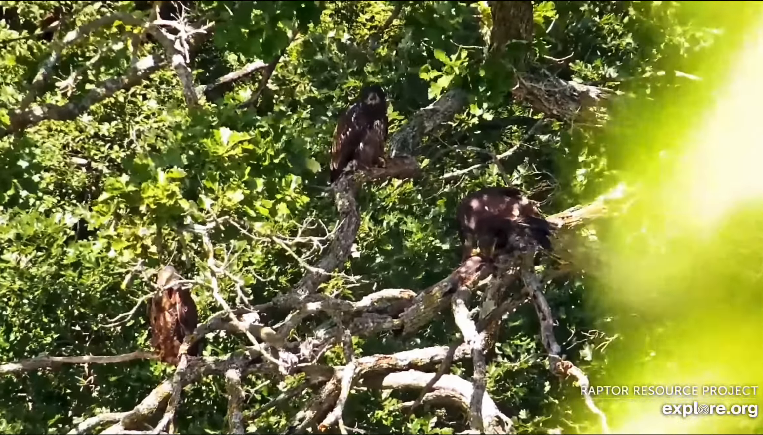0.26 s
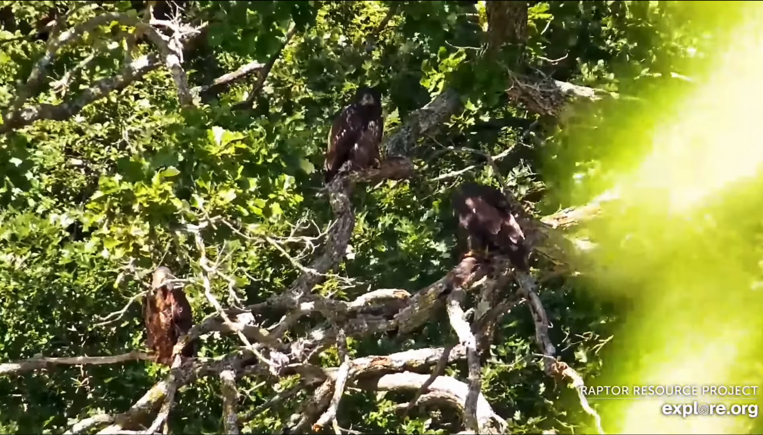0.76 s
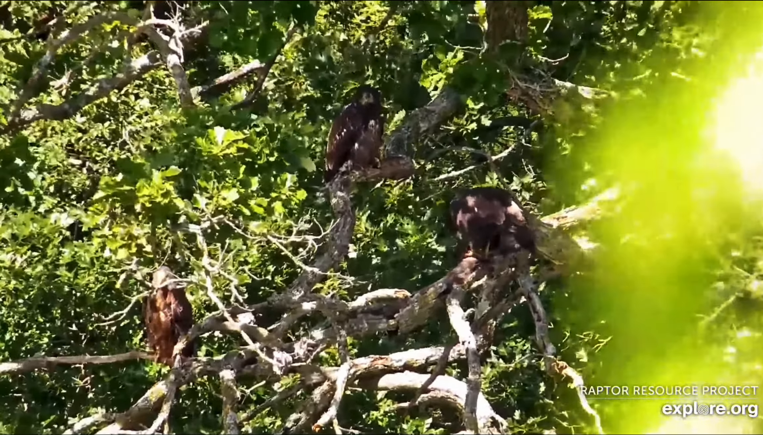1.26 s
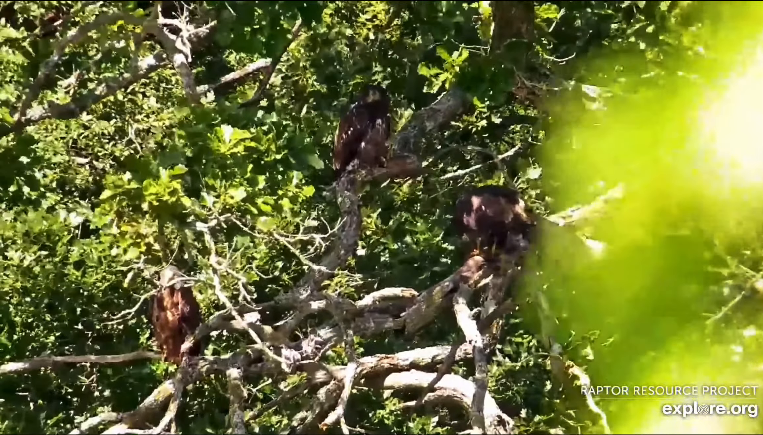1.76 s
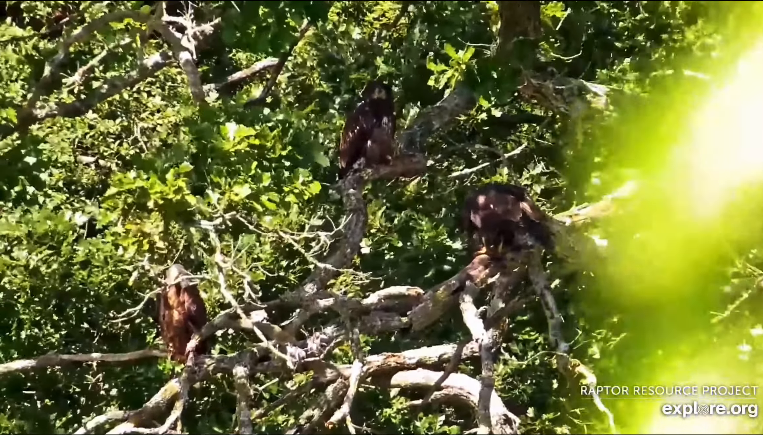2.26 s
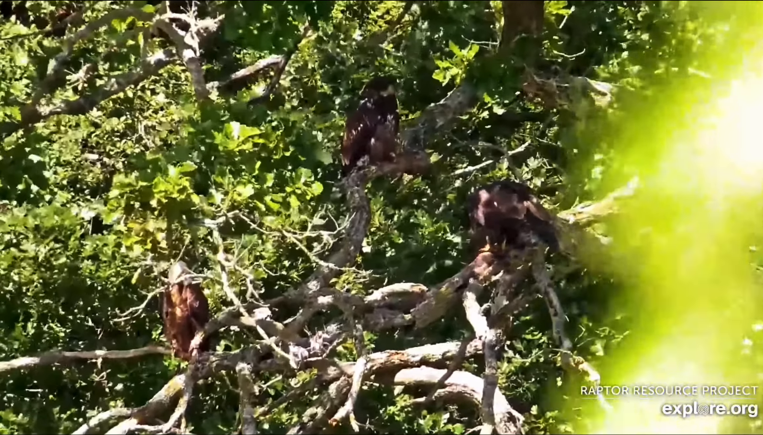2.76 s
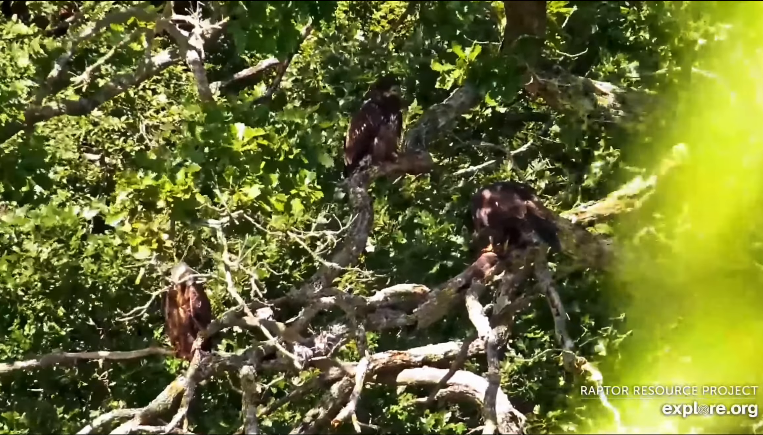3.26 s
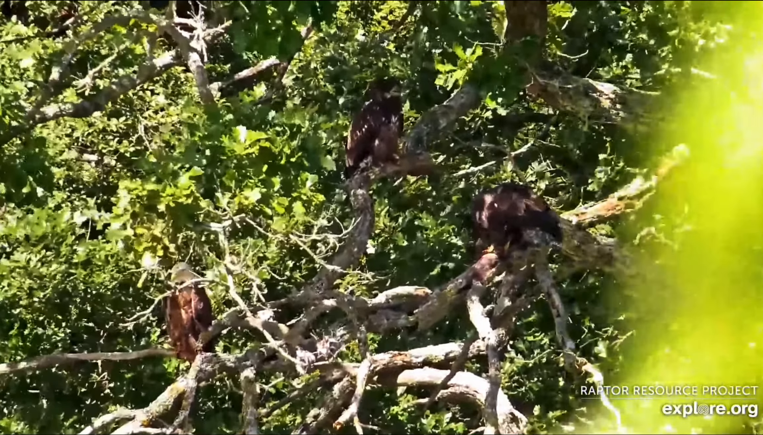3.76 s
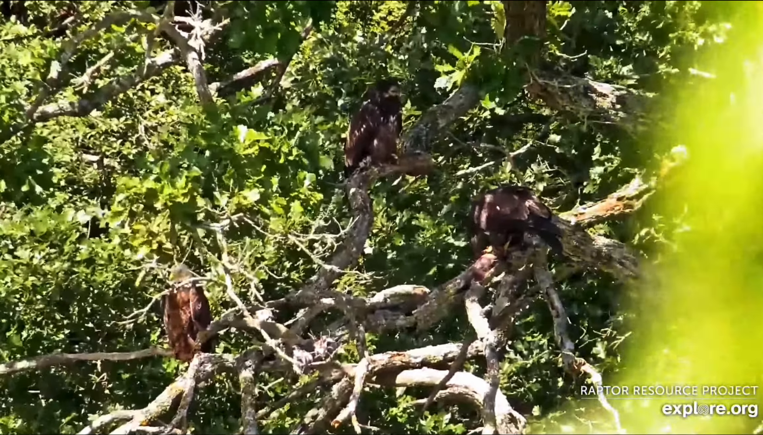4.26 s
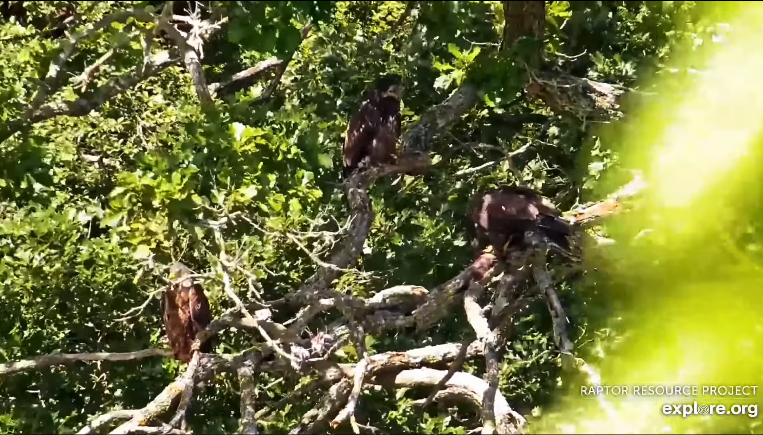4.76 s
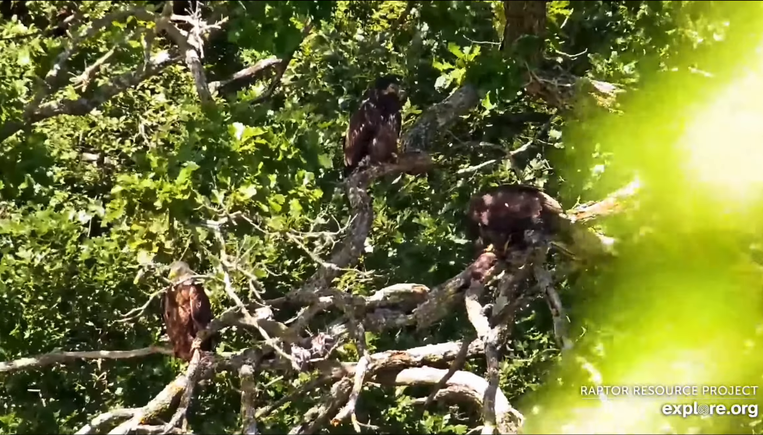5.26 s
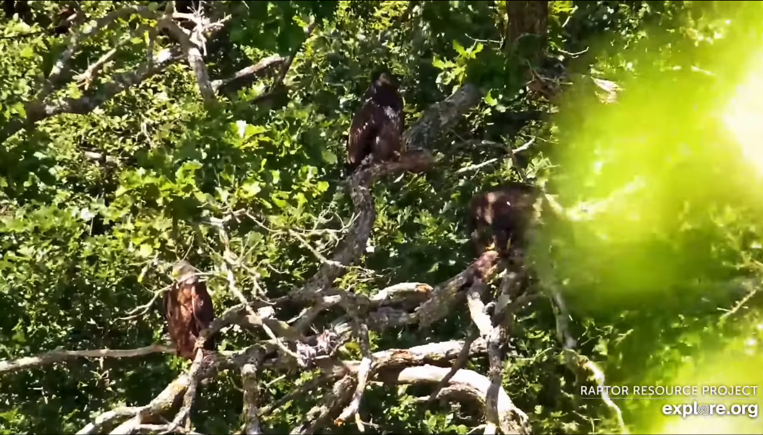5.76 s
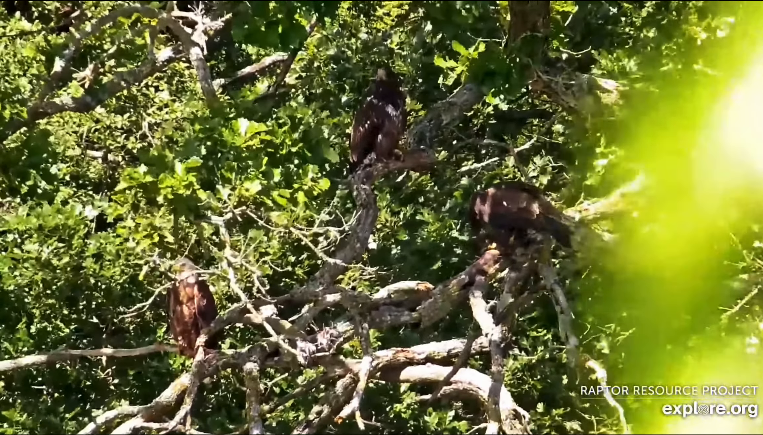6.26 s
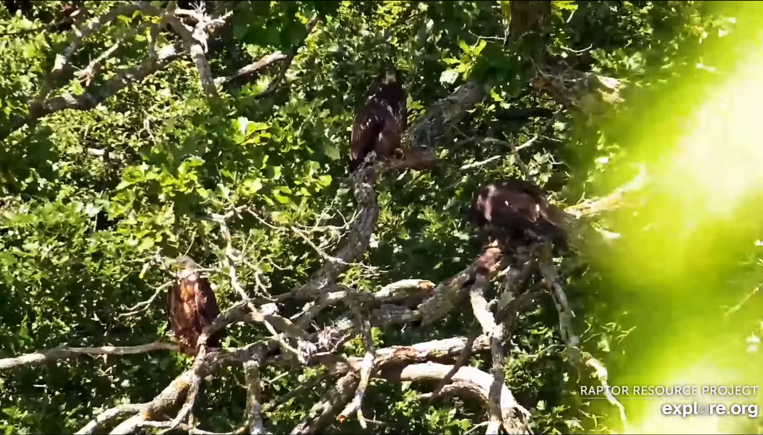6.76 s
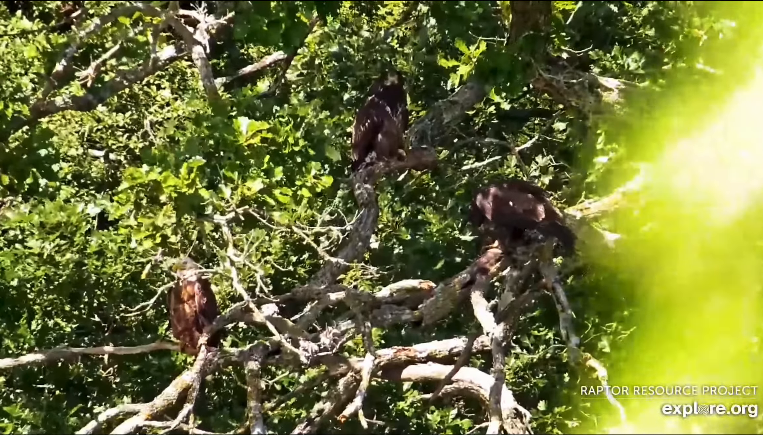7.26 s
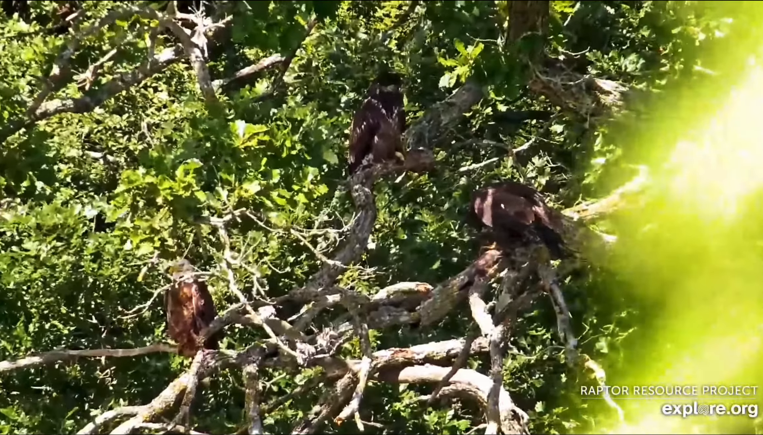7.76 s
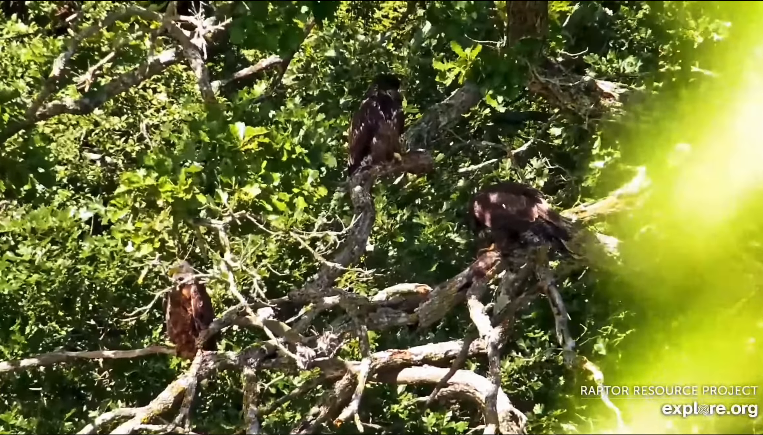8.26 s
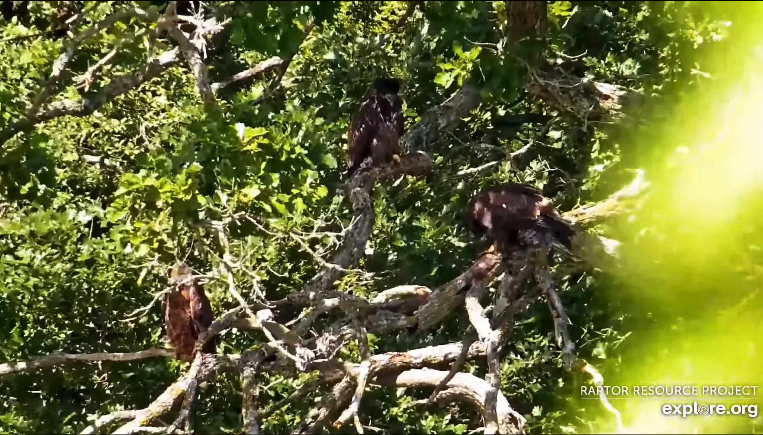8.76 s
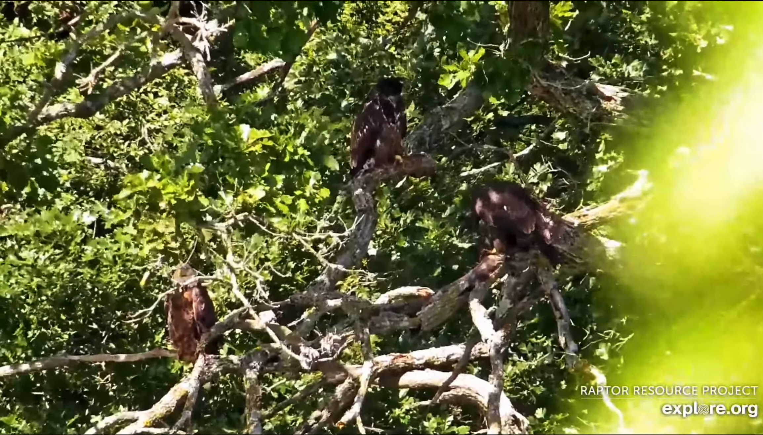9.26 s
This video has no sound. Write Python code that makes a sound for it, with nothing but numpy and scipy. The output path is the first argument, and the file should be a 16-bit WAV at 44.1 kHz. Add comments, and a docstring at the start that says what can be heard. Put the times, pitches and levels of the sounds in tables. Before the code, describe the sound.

Outdoors in woodland, a close songbird opens with a quick flurry while far hoarse caws, two young eagle squeals and soft low wind gusts overlap. A small distant bird seesaws up and down, smeared by echoes. After faint twitter, four more squeals climb, crack and tumble. A quieter gap leads to a longer, louder songbird flurry. A fixed outdoor microphone adds constant low hum and a thin buzzing whine.

```python
"""First come a near songbird's opening flurry, far hoarse caws, two squeals of young eagles and gusts of rumble.
A seesaw song and its blurred echoes follow, with level tails of the second squeal, then faint far twitter.
The eagles squeal again, climbing, breaking, tumbling; a longer flurry of the near songbird ends the scene.
Voices are wavering sines with a weak octave; the trees are sparse echoes; air and blurred song are noise;
gear hums and whines throughout over a steady hush: low tones and a chirp on every mains half wave."""
import sys
import numpy as np
from scipy import signal
from scipy.fft import rfft, irfft
from scipy.io import wavfile
from scipy.ndimage import uniform_filter1d

SR = 44100
rng = np.random.default_rng(int(sys.argv[2]) if len(sys.argv) > 2 else 0)


def transcribe(u):
    """Save the signal u as a 16-bit wav file named by the first command-line argument.

    u: samples, shape (n,) or (channels, n), limited to [-1, 1]; the rate is SR.
    q: integer samples, one column per channel.
    """
    v = np.clip(np.atleast_2d(u).T, -1, 1)
    q = np.round(v * 32767).astype(np.int16)
    wavfile.write(sys.argv[1], SR, q)


N = 419391
T = np.arange(N) / SR   # time [s]

# swells of blurred high song: first the seesaw song's echoes among the trees, later faint far twitter:
# (middle [s], half width [s], level [dB])
HIGH_SWELLS = [(1.25, 0.24, -64), (1.56, 0.11, -61.5), (2.2, 0.47, -70), (3.03, 0.12, -70),
               (4.72, .12, -69)]
# bouts of a far, lower song: (middle [s], half width [s], level [dB])
LOW_BOUTS = [(2.55, .15, -74), (3.12, .22, -73)]
HIGH_BED_DB, LOW_BED_DB = -75, -80   # between the swells and bouts


def from_db(db):
    """Decibels to gain."""
    return 10 ** (np.asarray(db) / 20)


def rms_one(x):
    """Scale to unit rms."""
    return x / np.sqrt(np.mean(x ** 2) + 1e-20)


def drift(rate, size=N):
    """Random wander joining `rate` new normal values a second by straight lines."""
    at = np.arange(size) / SR * rate
    points = int(at[-1]) + 2
    return np.interp(at, np.arange(points), rng.standard_normal(points))


def noise(colour):
    """Unit noise with the given spectrum."""
    hz, db = np.transpose(colour)
    bins = np.maximum(np.arange(N // 2 + 1) * SR / N, 1)
    gain = from_db(np.interp(np.log(bins), np.log(hz), db, left=-80))
    return rms_one(irfft(rfft(rng.standard_normal(N)) * gain, N))


def surges(bed_db, rows):
    """Gain of a bed with bell-shaped surges on top, added in power."""
    power = from_db(bed_db) ** 2
    for middle, width, db in rows:
        power = power + from_db(db) ** 2 * np.exp(-((T - middle) / width) ** 2)
    return np.sqrt(power)


def progress(length_s):
    """A ramp from 0 to 1 over one note."""
    return np.linspace(0, 1, max(int(length_s * SR), 16))


def glide(u, start, middle, end):
    """A pitch that bends smoothly through three values as u goes from 0 to 1."""
    return start * (1 - u) * (1 - 2 * u) + middle * 2 * u * (2 - 2 * u) + end * u * (2 * u - 1)


def swell(u, peak):
    """A rounded rise and fall with its top at u = peak."""
    return np.sin(np.interp(u, [0, np.clip(peak, .05, .95), 1], [0, np.pi / 2, np.pi])).clip(0)


def add(out, s, sound):
    """Mix a sound in at time s."""
    i = int(np.clip(s * SR, 0, N - 1))
    out[i:i + len(sound)] += sound[:N - i]


def syrinx(hz, jitter, flutter_db, overtone_db):
    """A nearly pure whistle of about unit rms, unsteady in pitch and strength, with a weak octave."""
    phase = 2 * np.pi * np.cumsum(hz * (1 + jitter * drift(501, size=len(hz)))) / SR
    strength = from_db(flutter_db * drift(130, size=len(hz)))
    return np.sqrt(2) * strength * (np.sin(phase) + from_db(overtone_db) * np.sin(2 * phase))


def whistle(hz, peak):
    """One songbird note along a pitch track; the high ones are rougher."""
    jitter = .016 if hz.mean() > 4500 else .006
    voice = syrinx(hz, jitter, flutter_db=2.5, overtone_db=-48)
    return swell(np.linspace(0, 1, len(hz)), peak) ** 0.67 * voice


def slur(length_s, pitches, peak):
    """A whistle that bends through three pitches."""
    return whistle(glide(progress(length_s), *pitches), peak)


def trill(length_s, per_s, top_hz, bottom_hz):
    """An uneven trill in which the pitch drops anew with every chip."""
    u = progress(length_s)
    chip = (u * length_s * per_s + .13 * drift(per_s, size=len(u))) % 1   # place within a chip, 0-1
    hz = top_hz + (bottom_hz - top_hz) * chip
    voice = syrinx(hz, jitter=.055, flutter_db=2.5, overtone_db=-36)
    return swell(u, 0.51) ** 0.44 * swell(chip, 0.51) * voice


def wood(x, wet_db, t60, build_s, edge_s, edge_db, dull_hz):
    """Branches send back many small, dull echoes; a cluster comes late from the edge of the wood."""
    t = T[:SR]
    echoes = rng.standard_normal(SR) * (rng.random(SR) < 1500 / SR)   # about 1500 a second
    decay = from_db(-60 * t / t60) * (1 - np.exp(-t / build_s))
    edge = from_db(edge_db) * np.exp(-((t - edge_s) / 0.0061) ** 2)
    echoes *= decay + edge
    tail = signal.fftconvolve(x, echoes / np.sqrt(np.sum(echoes ** 2)))[:N]
    dulling = signal.butter(2, dull_hz, fs=SR, output="sos")
    return from_db(wet_db) * signal.sosfilt(dulling, tail)


def hush():
    """Steady outdoor hush: noise with a fixed colour."""
    # (frequency [Hz], relative density [dB per Hz])
    hush_colour = [(40, -10), (130, 0), (200, -3.5), (300, -9.5), (420, -16), (750, -21.5), (1500, -19.5),
                   (2700, -18), (3400, -18.5), (5000, -20), (6400, -24.5), (10000, -26.5), (13800, -29),
                   (16000, -27.5)]
    level_db = -61.8
    return from_db(level_db) * noise(hush_colour)


def rumble(lumpy_db):
    """Low, lumpy air noise: a few gusts over a calm that slowly dies down."""
    # gusts of air: (middle [s], half width [s], level [dB])
    gusts = [(.55, .05, -51), (1.02, 0.28, -48.5), (1.39, 0.067, -45), (1.7, 0.46, -53), (4.1, 0.73, -58)]
    # (frequency [Hz], relative density [dB per Hz])
    rumble_colour = [(10, -24.5), (25, -10.5), (45, 1), (70, 0), (100, -4), (150, -11), (250, -25),
                     (500, -51)]
    calm_db, fall_db_per_s = -54, 0.49
    gain = surges(calm_db - fall_db_per_s * T, gusts)
    return gain * from_db(lumpy_db * drift(9)) * noise(rumble_colour)


def hum(level_db):
    """Steady low tones: a motor just under twice the mains rate beats with mains hum about twice a second."""
    # motor and mains tones: (frequency [Hz], rms level before level_db [dB])
    hum_tones = [(118.13, -53.5), (119.976, -59.5), (239.95, -71), (254.7, -78), (479.9, -86)]
    tones = np.zeros(N)
    for k, (hz, db) in enumerate(hum_tones):
        tones += (-1) ** k * from_db(db) * np.sin(2 * np.pi * hz * T)   # polarity alternates
    return np.sqrt(2) * from_db(level_db + 0.69 * drift(0.96)) * tones


def supply_whine(phase_jitter, flutter_db, stumble_share, stumble_jitter):
    """A switching supply chirps on each mains half wave; now and then it stumbles into a rasp."""
    # one chirp for each half wave: (start [mains cycles], length [mains cycles],
    # start pitch [Hz], middle pitch [Hz], end pitch [Hz])
    chirps = [(.368, .3328, 4369, 3794, 3670), (.8697, .3301, 4076, 4040, 4032)]
    # harmonics from the first up: level [dB]
    harmonics_db = [-60.5, -57, -61, -68]
    mains_hz = 59.988
    out, grid = np.zeros(N), progress(1)
    stumbling = uniform_filter1d(1.0 * (drift(330) > 1.25), size=20)
    for start, length, start_hz, middle_hz, end_hz in chirps:
        u = np.minimum((T * mains_hz - start) % 1 / length, 1)
        summed_pitch = np.cumsum(glide(grid, start_hz, middle_hz, end_hz)) / SR
        turns = np.interp(u, grid, summed_pitch) * length / mains_hz
        phase = 2 * np.pi * turns + phase_jitter * drift(160)
        rasp = stumble_jitter * stumbling * drift(1400)
        gate = np.clip(np.minimum(u, 1 - u) / .086, 0, 1)   # ramps at both ends, silent between chirps
        strength = gate * from_db(flutter_db * drift(400)) * (1 - stumble_share * stumbling)
        for k, db in enumerate(harmonics_db, 1):
            out += strength * from_db(db) * np.sin(k * phase + rasp)
    return np.sqrt(2) * out


def whine_side():
    """The top of a looser whine, to be laid over the two channels in opposite polarity."""
    loose_whine = supply_whine(phase_jitter=1.5, flutter_db=1.0, stumble_share=.3, stumble_jitter=1.5)
    top_only = signal.butter(16, 4900, "high", fs=SR, output="sos")
    return from_db(-16) * signal.sosfilt(top_only, loose_whine)


def blurred_song():
    """Swells of high song and a far, lower song, both blurred into flickering patches of noise."""
    # both colours: (frequency [Hz], relative density [dB per Hz])
    high_colour = [(3800, -18), (4600, -4), (5200, -5.5), (6200, -10.5), (7200, -0.5), (8500, -41)]
    low_colour = [(1900, -20), (2450, -1), (2700, 0.5), (3100, -11.5), (3600, -17.5)]
    high = surges(HIGH_BED_DB, HIGH_SWELLS) * from_db(2.5 * drift(24)) * noise(high_colour)
    low = surges(LOW_BED_DB, LOW_BOUTS) * from_db(2.5 * drift(24)) * noise(low_colour)
    return high + low


def stray_notes():
    """Single notes at random times that stand out of the blurred song, their strength following it."""
    per_s, length_s, level_db = 3, .05, -2   # for each layer; level relative to the layer's gain
    high_hz, low_hz = (5350, 5180, 5030), (2567, 2706, 2680)   # (start, middle, end), before detuning
    layers = ((high_hz, surges(HIGH_BED_DB, HIGH_SWELLS)), (low_hz, surges(LOW_BED_DB, LOW_BOUTS)))
    out = np.zeros(N)
    for pitches, gain in layers:
        for when, detune in rng.random((int(per_s * N / SR), 2)):
            note = slur(length_s, np.array(pitches) * (1 + .12 * (detune - .5)), peak=.5)
            add(out, when * N / SR, from_db(level_db) * gain[int(when * N)] * note)
    return out


def seesaw():
    """A small bird deep in the wood, heard mostly by its echoes: up, then down from higher still."""
    # the turn of each figure: (time [s], level before echoes [dB])
    turns = [(1.056, -65.5), (1.242, -59.5), (1.408, -57.5), (1.57, -58)]
    up_s, up_hz = .086, (4100, 4800, 5560)   # pitches (start, middle, end)
    down_s, down_hz = .042, (7250, 6470, 5880)
    out = np.zeros(N)
    for s, db in turns:
        add(out, s - up_s, from_db(db) * slur(up_s, up_hz, peak=0.59))
        add(out, s, from_db(db) * slur(down_s, down_hz, peak=0.61))
    return out + wood(out, wet_db=1.0, t60=0.38, build_s=0.0037, edge_s=0.097, edge_db=-17, dull_hz=8500)


def caws():
    """Hoarse arched calls of a far, crow-like bird: a low voice roughened by strong pitch jitter."""
    # about every 0.4 s: (time [s], level [dB])
    calls = [(.098, -60.5), (.482, -59.5), (0.889, -70), (1.317, -67.5)]
    length_s, pitches = .115, (1268, 1448, 1190)   # pitches (start, middle, end) [Hz]
    out = np.zeros(N)
    u = progress(length_s)
    for s, db in calls:
        voice = syrinx(glide(u, *pitches), jitter=0.045, flutter_db=2.2, overtone_db=-30)
        add(out, s, from_db(db) * swell(u, 0.33) ** 0.52 * voice)
    return out


def squeal_tails():
    """Level 3 kHz tails, echoes of the second squeal's opening: nearly pure tones on one pitch."""
    # (time [s], length [s], level [dB])
    tails = [(1.243, 0.21, -66), (1.701, .105, -57), (1.8, .12, -66.5)]
    pitch_hz = 3005
    out = np.zeros(N)
    for s, length, db in tails:
        u = progress(length)
        tone = syrinx(np.full(len(u), pitch_hz), jitter=0.0035, flutter_db=2.0, overtone_db=-46)
        add(out, s, from_db(db) * swell(u, .3) ** .55 * tone)
    return out


def held_notes(out):
    """Notes of the near singer that slide from an onset onto a held pitch."""
    # (time [s], length [s], onset pitch [Hz], held pitch [Hz], end pitch [Hz],
    # level [dB], place of the peak [0-1])
    notes = [ (.002, .071, 2800, 3350, 3275, -51.5, .6), (0.437, 0.043, 3430, 3510, 3300, -52, 0.6),
             (.498, 0.026, 3300, 3340, 3300, -43, 0.2), (7.877, .104, 4450, 3340, 3280, -40, 0.52),
             (8.162, .045, 3370, 3630, 3635, -48, 0.08), (8.197, 0.059, 3565, 3590, 3410, -40, 0.22),
             (8.349, 0.054, 3474, 3183, 3416, -44, .35), (8.772, 0.099, 3530, 3285, 3412, -38.5, 0.88)]
    settle_s = .016
    for s, length, onset_hz, held_hz, end_hz, db, peak in notes:
        u = progress(length)
        onset_slide = (onset_hz - held_hz) * np.exp(-u * length / settle_s)
        hz = held_hz + (end_hz - held_hz) * u + onset_slide
        add(out, s, from_db(db) * whistle(hz, peak))


def swoops(out):
    """Steep slurs down from the top of the near singer's voice."""
    # (time [s], level [dB])
    rows = [(.347, -44), (8.678, -43)]
    for s, db in rows:
        add(out, s, from_db(db) * slur(.102, (5256, 3520, 2827), peak=.62))


def chatter(out):
    """Low chatter of the near singer: a slur down, a trill and a fading slur lower still."""
    # (time [s], level of the trill [dB])
    rows = [(.046, -51.5), (8.4, -50)]
    slur_s, slur_hz, slur_db = .065, np.array((2524, 2220, 2120)), -3   # levels relative to the trill
    end_delay_s, end_ratio, end_db = .12, .84, -13.5   # end_ratio lowers the pitch of the last slur
    for s, db in rows:
        add(out, s, from_db(db + slur_db) * slur(slur_s, slur_hz, peak=0.15))
        chips = trill(.072, per_s=62, top_hz=2820, bottom_hz=2110)
        add(out, s + slur_s, from_db(db) * chips)
        last = slur(slur_s, end_ratio * slur_hz, peak=.3)
        add(out, s + end_delay_s, from_db(db + end_db) * last)


def mews_and_chips(out):
    """Mews that sag ever faster, and quick chips that slide fastest at first."""
    # both: (time [s], length [s], start pitch [Hz], end pitch [Hz], level [dB])
    mews = [(9.162, .15, 2724, 2375, -56), (9.419, 0.096, 2490, 1860, -55.5)]
    chips = [ (.063, .028, 5170, 4500, -59), (.285, .024, 5050, 4530, -61), (7.487, .02, 2750, 3250, -62),
             (7.505, 0.031, 3260, 2430, -57), (7.674, 0.021, 2510, 3710, -53.5),
             (7.862, 0.031, 4090, 4250, -49), (8.853, 0.02, 2260, 2100, -59),
             (9.007, .018, 3020, 1700, -58.5), (9.075, 0.038, 3130, 3480, -55.5),
             (9.101, .032, 2430, 2280, -58), (9.125, 0.0137, 3440, 2520, -54.5),
             (9.144, 0.012, 3400, 2710, -52), (9.382, 0.029, 4000, 2930, -53)]
    for rows, bend, peak in ((mews, .28, .38), (chips, .65, .6)):   # bend: share of the slide at half time
        for s, length, start_hz, end_hz, db in rows:
            middle_hz = start_hz + bend * (end_hz - start_hz)
            add(out, s, from_db(db) * slur(length, (start_hz, middle_hz, end_hz), peak))


def falling_trills(out):
    """Short trills of falling chips."""
    # (time [s], length [s], rate [chips per s], top pitch [Hz], bottom pitch [Hz], level [dB])
    rows = [ (7.7, 0.066, 140, 5970, 4450, -54.5), (8.249, 0.023, 116, 3230, 2220, -51),
            (9.386, 0.041, 117, 6240, 4300, -47)]
    for s, length, per_s, top_hz, bottom_hz, db in rows:
        add(out, s, from_db(db) * trill(length, per_s, top_hz, bottom_hz))


def near_singer():
    """A varied song in two flurries: held notes, swoops, chatter, mews, chips and trills."""
    out = np.zeros(N)
    held_notes(out)
    swoops(out)
    chatter(out)
    mews_and_chips(out)
    falling_trills(out)
    return out


def eagles():
    """Each squeal creeps up, leaps to its top, then tumbles down in three rough steps."""
    # (start [s], break [s], end [s], start pitch [Hz], top pitch [Hz], end pitch [Hz],
    # climb level [dB], tumble level [dB])
    squeals = [ (.255, .528, .592, 2870, 3800, 2400, -54, -52),
               (.926, 1.18, 1.254, 2890, 3800, 2400, -55.5, -53),
               (3.52, 3.915, 3.992, 2850, 4000, 1900, -72, -67),
               (4.19, 4.388, 4.468, 3000, 4050, 1900, -60, -58),
               (4.67, 4.914, 4.98, 3120, 4400, 1900, -65, -59),
               (5.285, 5.535, 5.61, 3050, 4050, 1870, -57, -56)]
    leap_before_s, leap_s = 0.033, .012   # the leap comes just before the break
    creep_share = .6   # part of the climb done by creeping
    out = np.zeros(N)
    for start, crack, end, start_hz, top_hz, end_hz, climb_db, tumble_db in squeals:
        u = progress(crack - start)
        to_break_s = (1 - u) * (crack - start)
        leap = .5 + .5 * np.tanh((leap_before_s - to_break_s) / leap_s)
        hz = start_hz + (top_hz - start_hz) * (creep_share * u + (1 - creep_share) * leap)
        hz = hz * (1 + .007 * drift(45, size=len(u)))   # the young voice wavers
        faltering = from_db(2.5 * drift(40, size=len(u)))
        voice = syrinx(hz, jitter=0.0063, flutter_db=3.0, overtone_db=-25)
        add(out, start, from_db(climb_db) * swell(u, 0.64) ** 0.43 * faltering * voice)

        u = progress(end - crack)
        step = 6 * np.pi   # three steps
        hz = top_hz * (end_hz / top_hz) ** (u + 0.31 * np.sin(step * u) / step)
        held = 1 - .5 * np.cos(step * u)   # loudest while the pitch lingers on a step
        voice = syrinx(hz, jitter=0.03, flutter_db=2.0, overtone_db=-14.5)
        add(out, crack, from_db(tumble_db) * swell(u, 0.11) ** 0.61 * held * voice)
    return out


def scene():
    """One microphone hears it all; only the top of the whine differs a little between the channels."""
    air = rumble(lumpy_db=1.16) + hush()
    whine = supply_whine(phase_jitter=0.23, flutter_db=1.37, stumble_share=0.17, stumble_jitter=2.1)
    gear = hum(level_db=-3.0) + whine
    birds = stray_notes() + caws() + squeal_tails() + near_singer() + eagles()
    birds = birds + wood(birds, wet_db=-5.0, t60=0.74, build_s=0.0024, edge_s=0.13, edge_db=-22, dull_hz=4600)
    middle = air + gear + blurred_song() + seesaw() + birds
    return middle + whine_side() * np.array([[1], [-1]])


def record(dry):
    """A steep low-pass cuts the top."""
    cutoff_hz = 15700
    return signal.sosfilt(signal.ellip(12, .1, 80, cutoff_hz, fs=SR, output="sos"), dry)


dry = scene()
out = record(dry)
transcribe(out)
```